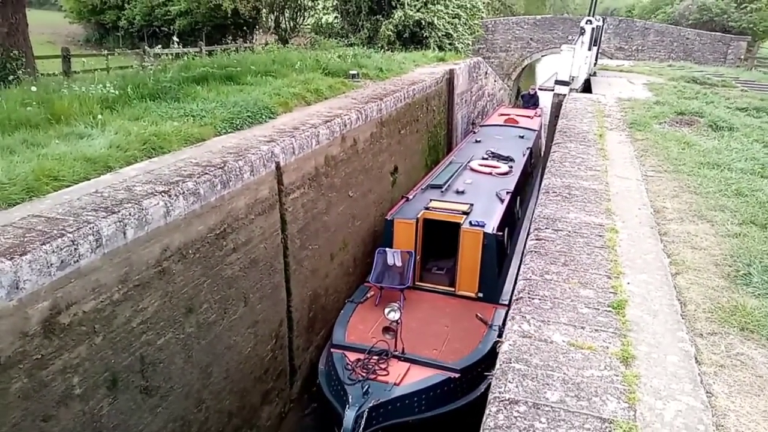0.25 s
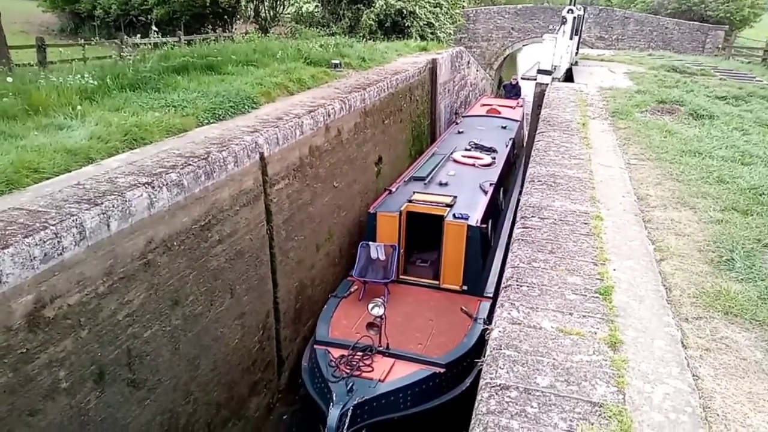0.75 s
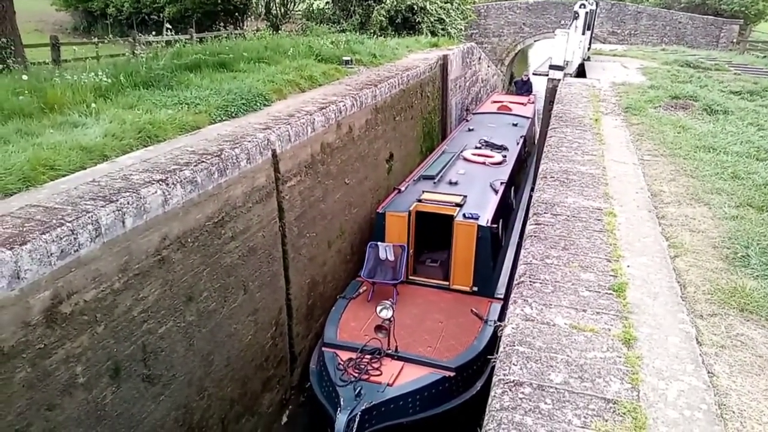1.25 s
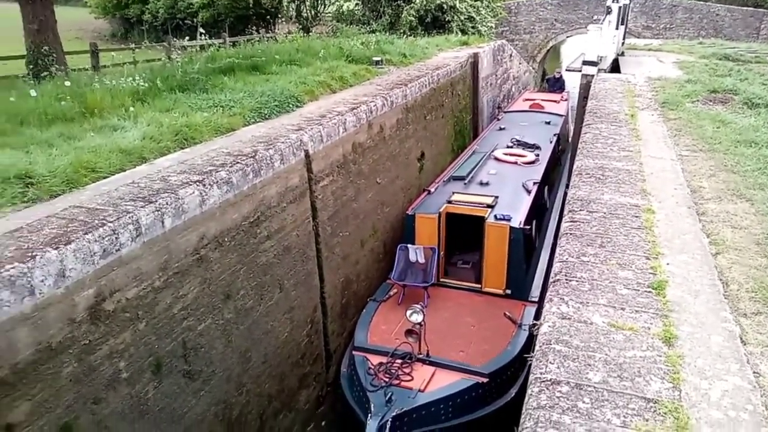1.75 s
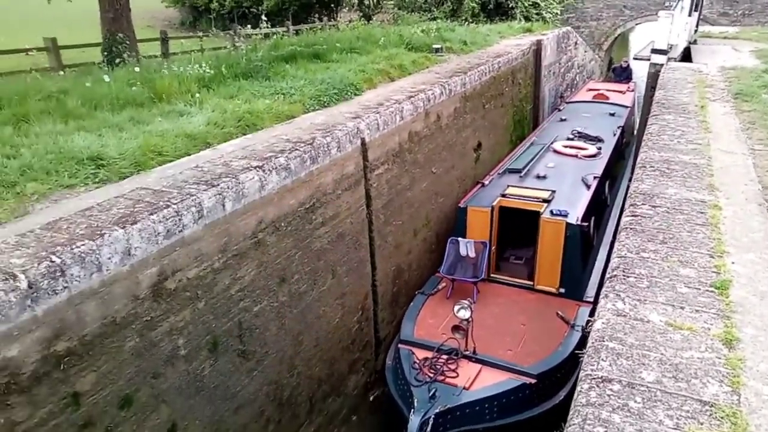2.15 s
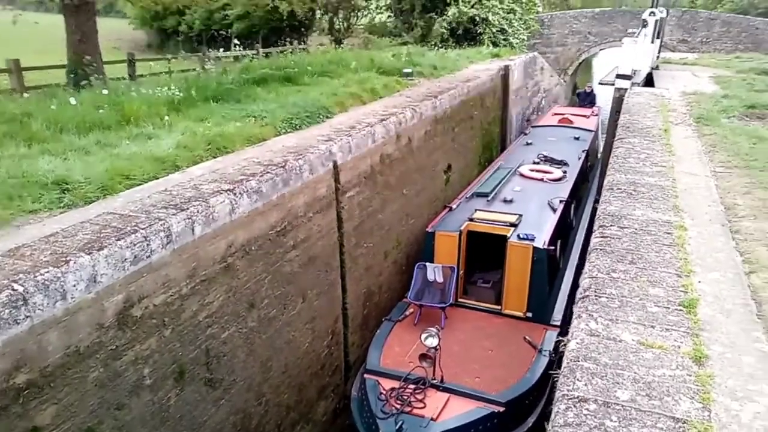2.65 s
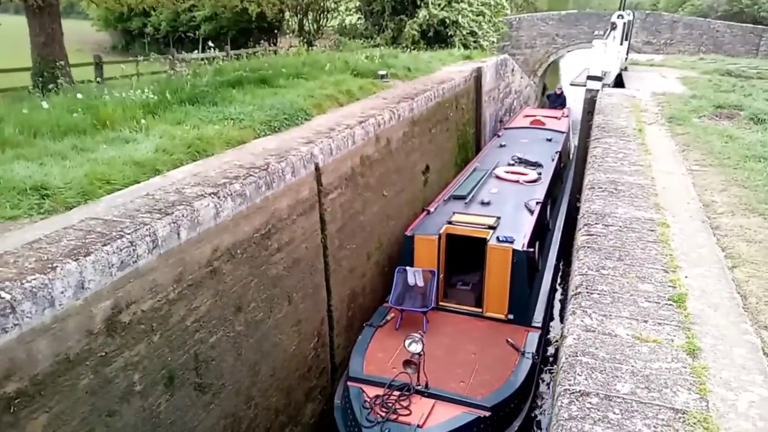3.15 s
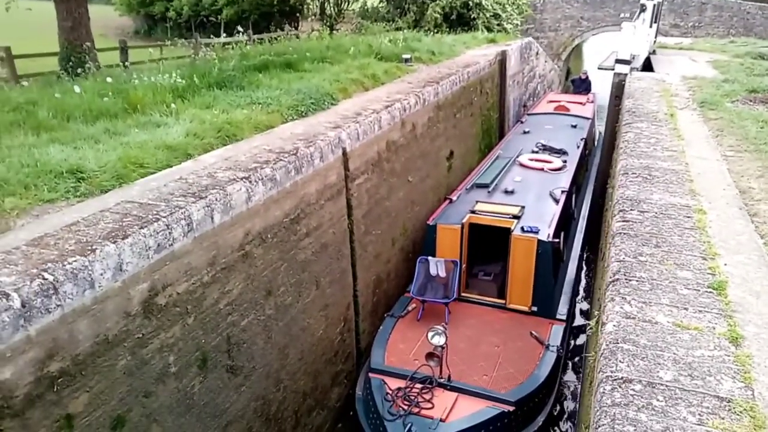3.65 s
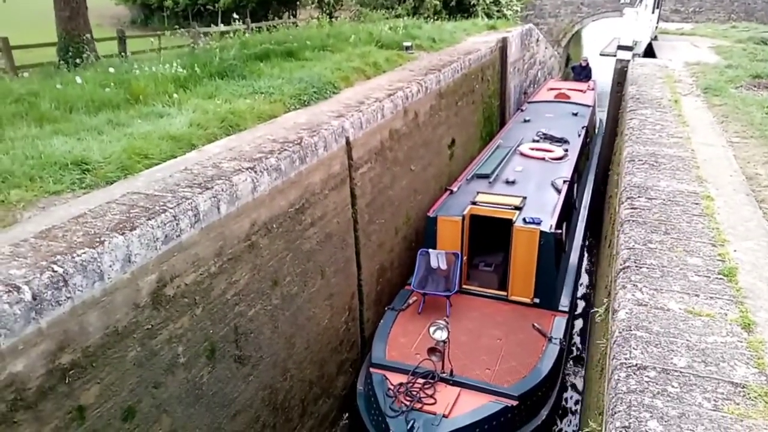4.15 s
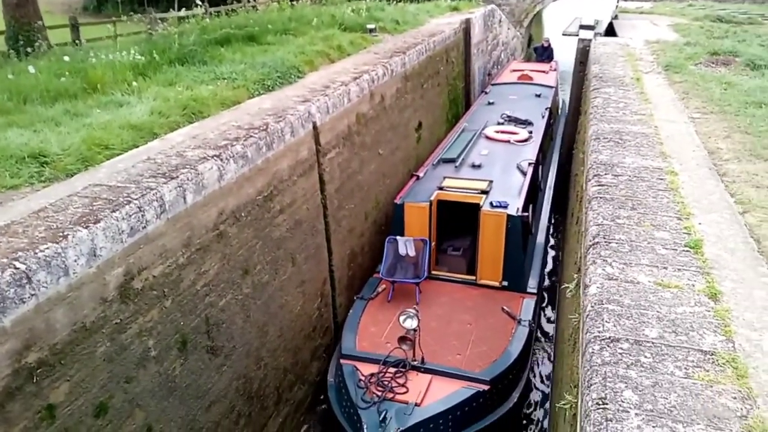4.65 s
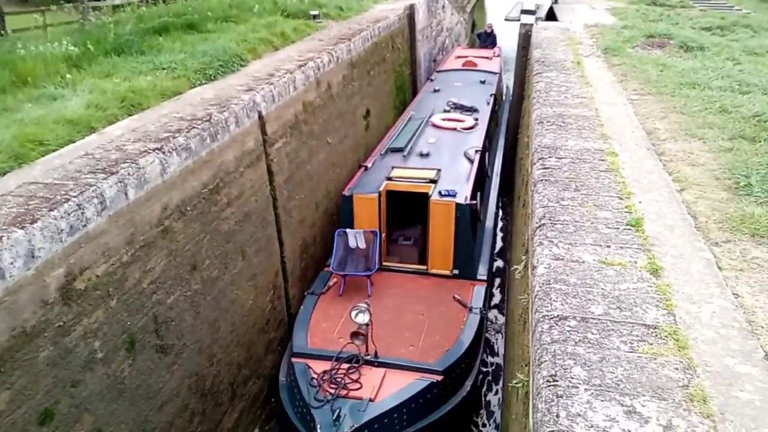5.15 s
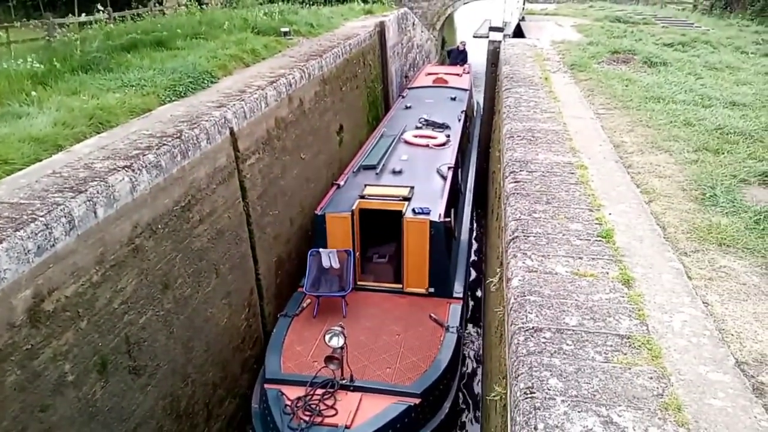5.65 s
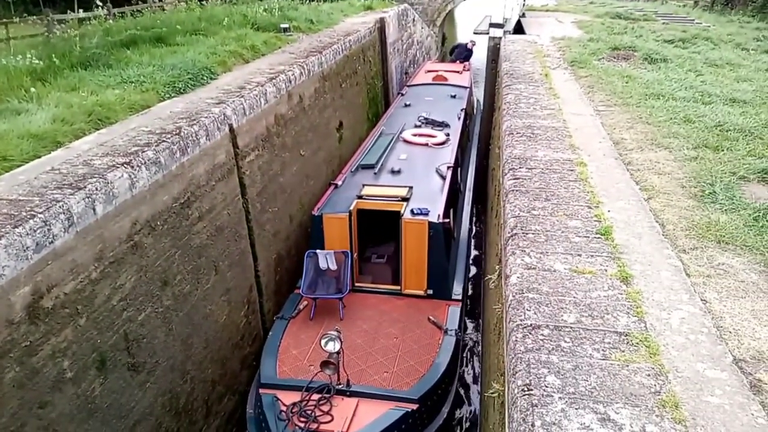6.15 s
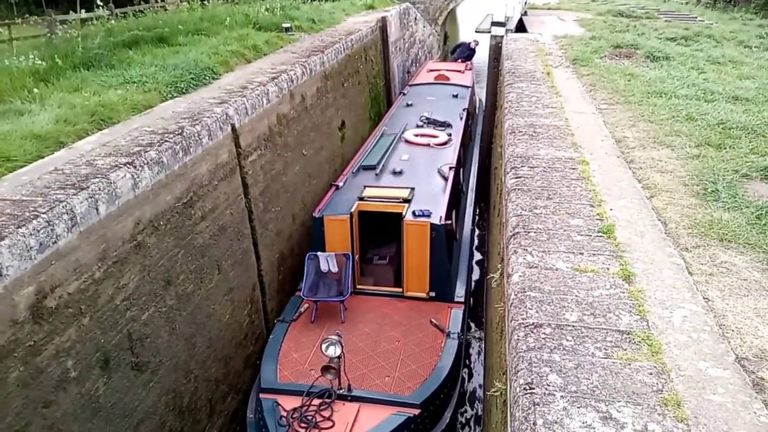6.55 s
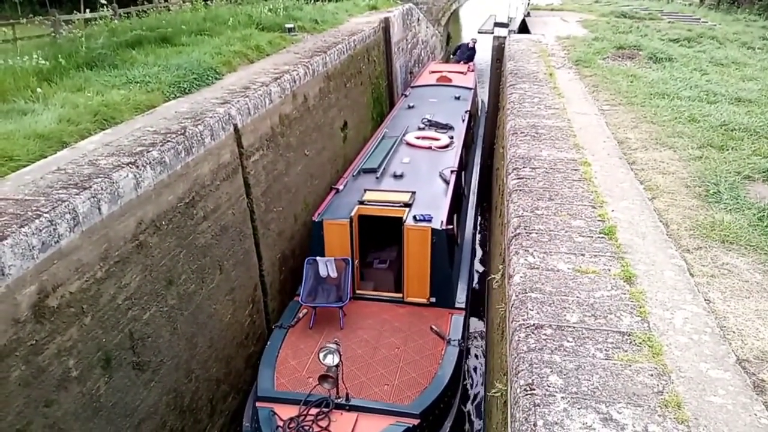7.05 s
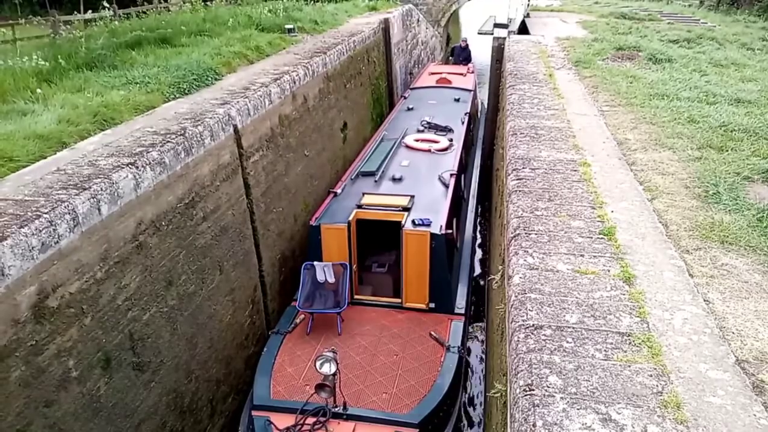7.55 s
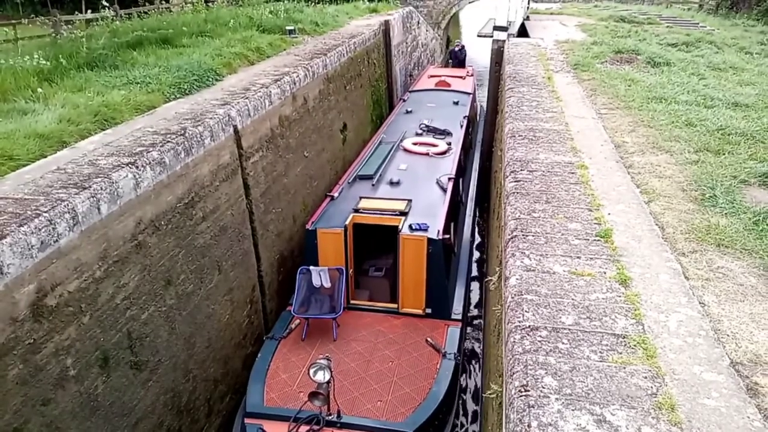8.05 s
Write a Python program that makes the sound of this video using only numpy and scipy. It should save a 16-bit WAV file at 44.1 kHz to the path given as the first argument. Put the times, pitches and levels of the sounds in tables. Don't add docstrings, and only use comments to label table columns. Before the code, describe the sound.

Steady hissing, churning water fills a walled lock chamber, growing fuller, with low wind buffeting and a soft narrowboat engine hum underneath.

```python
import sys
import numpy as np
from scipy import signal
from scipy.fft import rfft, irfft
from scipy.io import wavfile
from scipy.ndimage import uniform_filter1d

SR = 44100
rng = np.random.default_rng(int(sys.argv[2]) if len(sys.argv) > 2 else 0)


def volts(x):
    e = np.asarray(x, float) / 20
    return 10 ** e


def transcribe(signal):
    frames = np.atleast_2d(signal).T
    limited = np.clip(frames, -1, 1)
    pcm = np.round(limited * 32767).astype(np.int16)
    wavfile.write(sys.argv[1], SR, pcm)


N = 366471
TIME_S = np.arange(N) / SR

# freq_hz, level_db (per Hz)
CHURN_COLOUR = [(40, -35), (90, -3.5), (250, 0), (450, -3), (680, -1), (900, -3), (1300, -5.5),
                (2500, -26.5), (5000, -57), (9000, -90)]
# freq_hz, level_db (per Hz)
FROTH_COLOUR = [(600, -17.5), (1200, -14), (1700, -1.5), (2300, 2), (2800, 0), (3300, -4.5), (4200, -11),
                (6000, -60), (9000, -90)]
# freq_hz, level_db (per Hz)
SPRAY_COLOUR = [(2500, -31.5), (3400, -9), (4300, -0.5), (5200, -2.5), (6200, 0.5), (6650, -0.5),
                (7100, -11), (7900, -27.5), (8600, -43), (10000, -62), (17000, -88)]
# freq_hz, level_db (per Hz)
MIST_COLOUR = [(5000, -30), (7500, -5), (8300, -6.5), (9200, -9.5), (9700, -7.5), (11200, -11),
               (12300, -14.5), (13300, -16.5), (13820, -16), (14300, -5.5), (14750, 0), (15700, -1),
               (17000, -1)]
# time_s, level_db
SPRAY_SURGE = [(0.0, -37), (0.14, -35), (0.99, -34), (1.78, -34), (1.83, -30.5), (1.85, -34.5),
               (1.96, -31.5), (3.08, -32.5), (3.63, -31), (4.42, -30.5), (4.51, -29), (6.41, -29),
               (6.5, -28), (6.62, -29), (6.71, -28.5), (7.5, -29), (8.1, -29), (8.31, -30)]
# centre_hz, width_hz
EDGE_DIPS = [
    (3200, 970),
    (1040, 990),
    (310, 170),
    (620, 130),
]
# middle_s, length_s, wind_db
GUSTS = [(.03, .2, -30.5), (.42, .15, -34), (.85, 0.34, -35), (1.138, 0.087, -31), (1.3, 0.11, -29),
         (1.42, .14, -26.5), (1.7, .15, -30), (1.92, .1, -32), (2.107, .09, -26), (2.47, 0.16, -22),
         (2.64, .14, -27), (2.82, .12, -27), (2.99, .1, -27), (3.22, .2, -30), (3.4, 0.11, -22),
         (3.702, .06, -27), (3.88, 0.18, -35), (4.08, 0.093, -32), (4.36, 0.18, -32), (4.717, 0.087, -27),
         (5.162, .1, -38), (5.57, .07, -27), (5.69, .08, -25), (5.82, 0.11, -25.5), (6.038, .12, -28),
         (6.566, .08, -20), (6.7, .09, -29), (7.17, .15, -37), (7.8, 0.079, -24), (8.08, .06, -26)]
# freq_hz, level_db (per Hz)
WIND_COLOUR = [(20, -32), (40, -15), (65, 1), (110, 2.5), (180, 0.5), (260, -7), (400, -17), (700, -46),
               (3000, -90)]
# time_s, peak_db, centre_hz
STRONG_EDDIES = [(1.314, -22, 147), (1.425, -20, 155), (1.434, -15.5, 121), (1.511, -21.5, 143),
                 (1.712, -16, 141), (2.115, -19, 179), (2.555, -22, 152), (2.57, -20, 120),
                 (2.592, -17, 146), (2.603, -20, 129), (2.647, -14, 167), (2.658, -14, 145),
                 (2.672, -19, 105), (2.714, -19, 180), (2.755, -15, 159), (2.774, -21, 139),
                 (2.836, -20.5, 228), (3.365, -14.5, 182), (3.392, -15, 135), (3.712, -25, 172),
                 (4.303, -20, 136), (5.777, -21, 185), (6.537, -22, 179), (6.553, -21, 113),
                 (6.598, -21, 117), (6.717, -22, 126), (7.764, -23, 110), (7.797, -24, 110),
                 (7.833, -25, 115), (7.875, -20, 127)]
FIRING_TONES = {8: -50, 12: -40.5, 16: -45.7, 24: -54, 27: -58, 28: -55, 32: -60, 34: -59, 35: -55, 36: -59,
                37: -56}
# time_s, low_hz, high_hz
SIDE_SPLITS = [(1.496, 4480, 6290), (1.709, 4050, 5250), (1.868, 5080, 6980), (1.868, 13610, 15800),
               (2.008, 4130, 5680), (2.008, 6200, 7670), (2.008, 9560, 11110), (5.097, 11630, 13090),
               (5.471, 4130, 5250), (5.471, 13010, 14470), (6.095, 4570, 6980), (6.28, 4050, 5250),
               (6.28, 7490, 9650), (6.746, 11630, 13090), (6.746, 14300, 15800), (8.139, 6800, 9040)]

BUBBLES_PER_S = 2500
FULL_DB, SPRAY_TRIM_DB = -29, -0.17
SETTLE_S = 0.8
FROTH_DB, FROTH_LAG = -5.5, 0.17
CHURN_DB, CHURN_LAG = -7, 0.45
MIST_DB, MIST_LAG = -18.6, 0.5
HIGH_DIP_DB, HIGH_DIP_WEAK_DB, HIGH_DIP_FROM_DB, HIGH_DIP_SPAN_DB = 1.84, 4, 3.5, 1.5
LOW_DIP_DB, LOW_DIP_GONE_DB = 2.5, 5
FOLLOW_SHARE, BOOM_SHARE = 0.58, 0.47
CALM_DB = -42
SMALL_PER_S = 30
SMALL_DB, SMALL_SPREAD_DB, SMALL_TOP_DB = 2.5, 3.5, -37.5
SMALL_LOW_HZ, SMALL_HIGH_HZ = 115, 210
RISE_TURNS, FALL_TURNS = 0.2, 0.22
PORT_HZ = 64.5
CYCLE_HZ = 7.79
TOP_EDGE_HZ = 15740


def evened(x):
    return x / np.sqrt(np.mean(x ** 2) + 1e-20)


def coloured(x, points):
    points_hz, points_db = np.transpose(points)
    hz = np.fft.rfftfreq(N, 1 / SR)
    gain_db = np.interp(np.log(hz + 1), np.log(points_hz + 1), points_db)
    return evened(irfft(rfft(x) * volts(gain_db), N))


def drift(top_hz):
    hz = np.fft.rfftfreq(N, 1 / SR)
    return evened(irfft(rfft(rng.standard_normal(N)) / (1 + (hz / top_hz) ** 2), N))


def water():
    spray_db = np.interp(TIME_S, *np.transpose(SPRAY_SURGE)) + SPRAY_TRIM_DB
    below_db = FULL_DB - uniform_filter1d(spray_db, size=round(SETTLE_S * SR), mode="nearest")
    seethe = turbulence(patchy_db=0.55) + 0.3 * bubbles()
    splash_db = 0.89 * drift(top_hz=21.1)
    churn_db = FULL_DB + CHURN_DB - (1 - CHURN_LAG) * below_db + 0.23 * splash_db
    froth_db = spray_db + FROTH_DB + FROTH_LAG * below_db + 1.07 * splash_db
    mist_db = spray_db + MIST_DB + MIST_LAG * below_db + 0.55 * splash_db + 0.53 * drift(top_hz=40)
    out = volts(churn_db) * coloured(seethe, CHURN_COLOUR)
    out += volts(froth_db) * coloured(seethe, FROTH_COLOUR)
    out += volts(spray_db + 0.6 * splash_db) * coloured(seethe, SPRAY_COLOUR)
    out += volts(mist_db) * coloured(seethe, MIST_COLOUR)
    return wall_edge(out, below_db)


def bubbles():
    size = volts(3.05 * np.minimum(rng.exponential(1, N), 5))
    size = size * (rng.random(N) < BUBBLES_PER_S / SR)
    pitches_hz = np.geomspace(300, 15000, num=30)
    kind = rng.integers(0, len(pitches_hz), N)
    out = np.zeros(N)
    for k, hz in enumerate(pitches_hz):
        turns = np.arange(round(24 * SR / hz)) * hz / SR
        envelope = np.exp(-turns / 3.9) * (1 - np.exp(-turns / 0.55))
        ring = np.sin(2 * np.pi * turns * (1 + 0.012 * turns)) * envelope
        out += signal.oaconvolve(size * (kind == k), ring * hz / 1000)[:N]
    return evened(out)


def turbulence(patchy_db):
    _, _, z = signal.stft(rng.standard_normal(N), SR, nperseg=512, noverlap=384)
    patches = uniform_filter1d(rng.standard_normal(z.shape), size=6, axis=0)
    patches = evened(uniform_filter1d(patches, size=24, axis=1))
    return evened(signal.istft(z * volts(patchy_db * patches), SR, nperseg=512, noverlap=384)[1][:N])


def wall_edge(out, below_db):
    weak = np.clip((below_db - HIGH_DIP_FROM_DB) / HIGH_DIP_SPAN_DB, 0, 1)
    high_db = HIGH_DIP_DB + (HIGH_DIP_WEAK_DB - HIGH_DIP_DB) * weak
    low_db = LOW_DIP_DB * np.clip(1 - below_db / LOW_DIP_GONE_DB, 0, 1)
    depths_db = [high_db, low_db, FOLLOW_SHARE * low_db, -BOOM_SHARE * low_db]
    for (hz, width_hz), dip_db in zip(EDGE_DIPS, depths_db):
        band = signal.lfilter(*signal.iirpeak(hz, hz / width_hz, SR), out)
        out = out - (1 - volts(-dip_db)) * band
    return out


def wind():
    wind_db = gusting()
    lumps = volts(-43 + 0.72 * (wind_db + 37.5) + 2.2 * drift(top_hz=25))
    rumble = lumps * coloured(rng.standard_normal(N), WIND_COLOUR)
    when, size, pitch = rng.random((round(SMALL_PER_S * N / SR), 3)).T
    when_s = 0.02 + when * (N / SR - 0.04)
    small_db = np.interp(when_s, TIME_S, wind_db) + SMALL_DB - SMALL_SPREAD_DB * size
    small_db = np.minimum(small_db, SMALL_TOP_DB)
    small_hz = SMALL_LOW_HZ + (SMALL_HIGH_HZ - SMALL_LOW_HZ) * pitch
    small = np.transpose([when_s, small_db, small_hz])
    t = np.arange(-600, 600) / SR
    eddies = np.zeros(N)
    for s, db, hz in [*STRONG_EDDIES, *small]:
        push = np.exp(-(t * hz / np.where(t < 0, RISE_TURNS, FALL_TURNS)) ** 2)
        eddies[round(s * SR) - 600:][:len(t)] += volts(db + 3.0) * push
    return rumble + signal.filtfilt(*signal.butter(2, PORT_HZ, "highpass", fs=SR), eddies)


def gusting():
    t = TIME_S[::64]
    power = volts(2 * CALM_DB)
    for s, length_s, db in GUSTS:
        power = power + volts(2 * db) * np.exp(-(2 * (t - s) / length_s) ** 2)
    return np.interp(TIME_S, t, 10 * np.log10(power))


def diesel():
    turns = np.cumsum(CYCLE_HZ * (1 + 0.0007 * drift(top_hz=0.6))) / SR
    nearer_db = np.interp(TIME_S, [0, 1.5, 5.5], [-3.5, -1.5, -0.5])
    out = np.zeros(N)
    for k, db in FIRING_TONES.items():
        strength = np.sqrt(2) * volts(db + nearer_db + 0.51 * drift(top_hz=2.3))
        out += strength * np.sin(2 * np.pi * (k * turns + rng.random()))
    return out


def scene():
    mono = water() + wind() + diesel()
    return np.array([mono, mono])


def roll_off(x):
    return signal.sosfilt(signal.butter(12, 17100, fs=SR, output="sos"), x)


def record(dry):
    hz, t, z = signal.stft(dry[0], SR, nperseg=1024, noverlap=768)
    z = z * (hz < TOP_EDGE_HZ)[:, None]
    apart = np.zeros(z.shape)
    for s, low_hz, high_hz in SIDE_SPLITS:
        apart += np.outer((hz > low_hz) & (hz < high_hz), np.clip(1.5 - abs(t - s) / 0.009, 0, 1))
    strength = np.sqrt(abs(uniform_filter1d(abs(z) ** 2, size=9, axis=0)))
    other = signal.stft(rng.standard_normal(N), SR, nperseg=1024, noverlap=768)[2]
    other *= 1.3 * strength / np.sqrt(np.mean(abs(other) ** 2))
    mid = signal.istft(z * np.sqrt(1 - apart / 2), SR, nperseg=1024, noverlap=768)[1][:N]
    side = signal.istft(other * apart / np.sqrt(2), SR, nperseg=1024, noverlap=768)[1][:N]
    return roll_off(np.array([mid + side, mid - side]))


dry = scene()
out = record(dry)
transcribe(out)
```